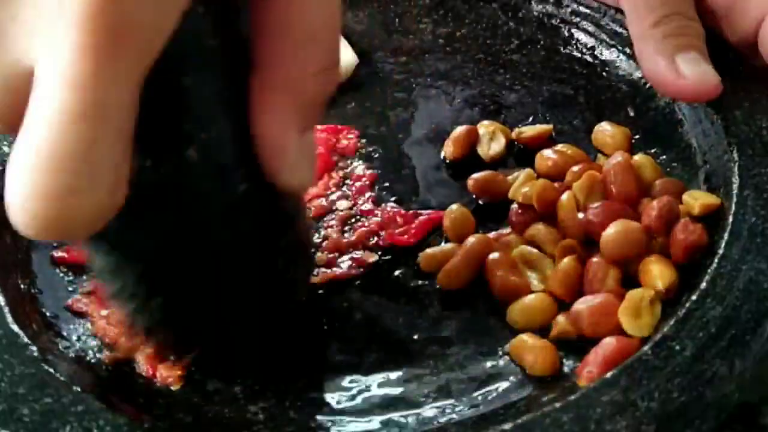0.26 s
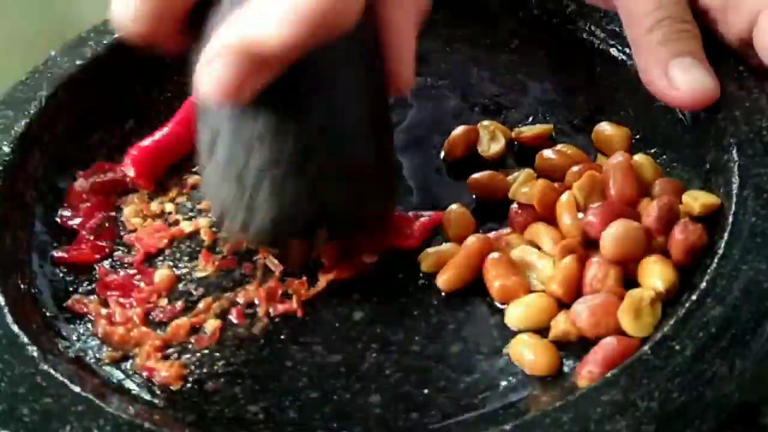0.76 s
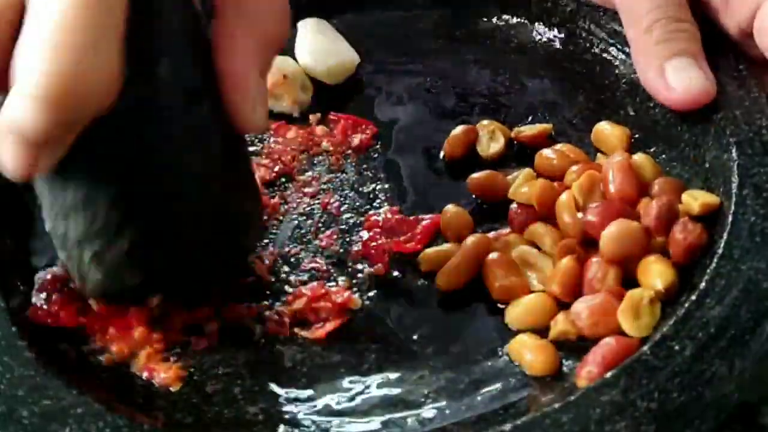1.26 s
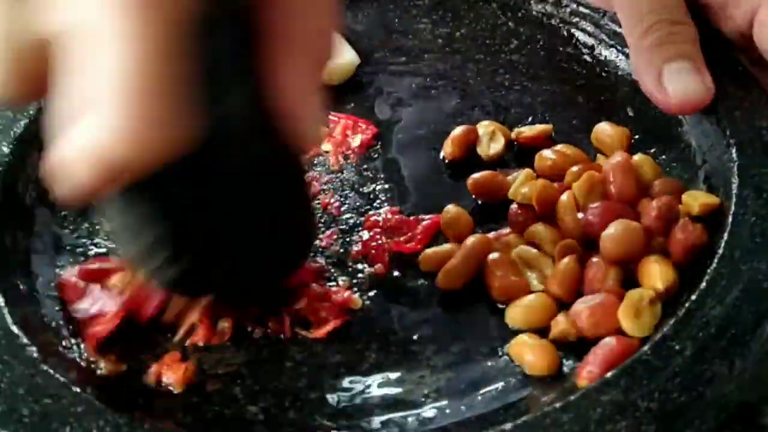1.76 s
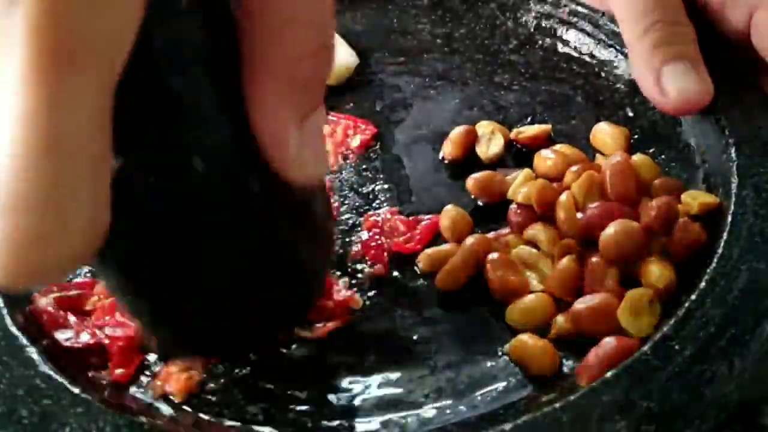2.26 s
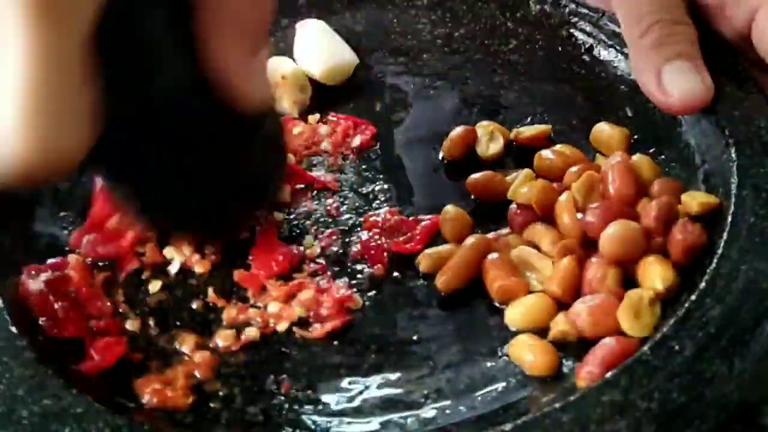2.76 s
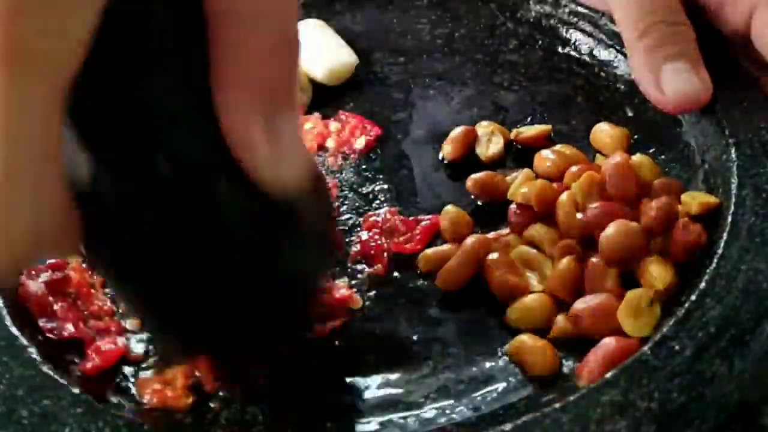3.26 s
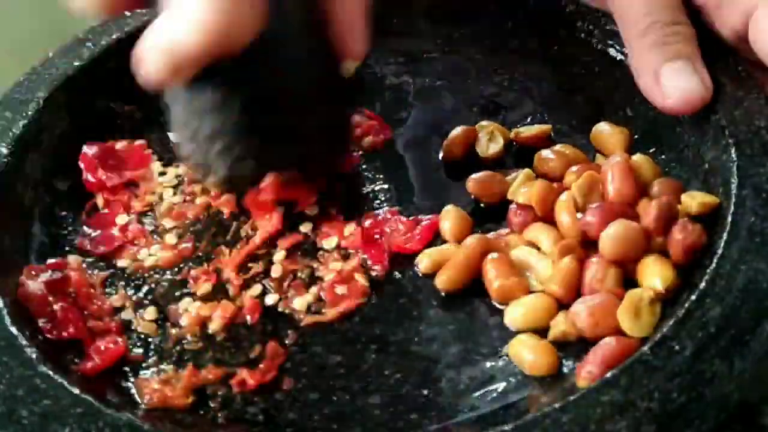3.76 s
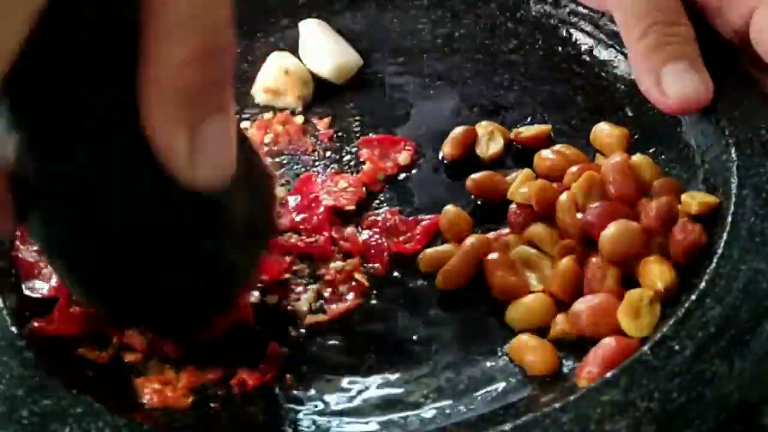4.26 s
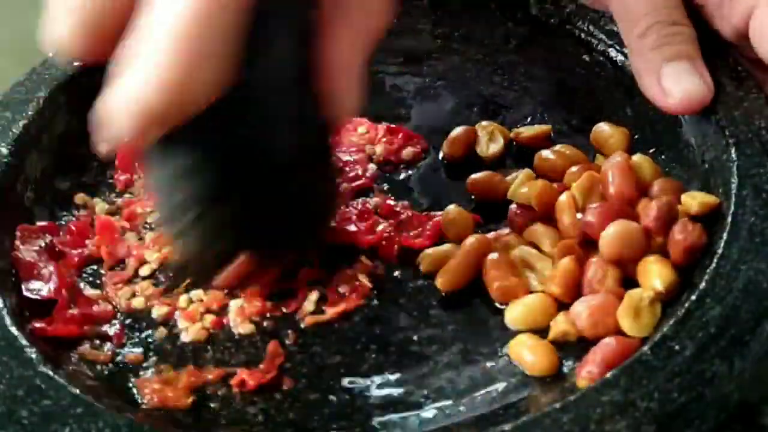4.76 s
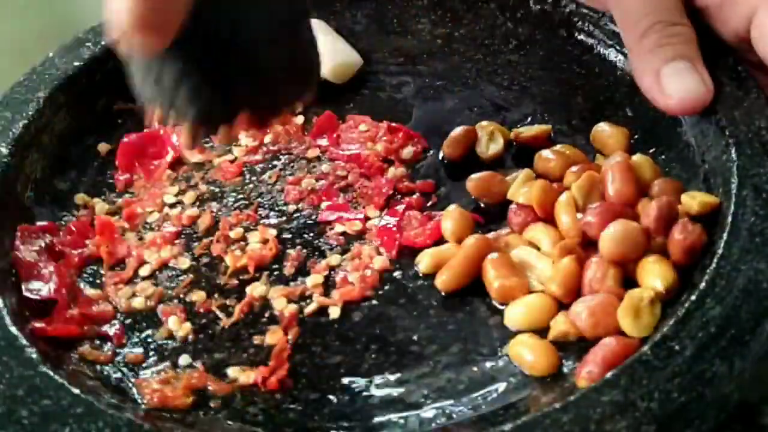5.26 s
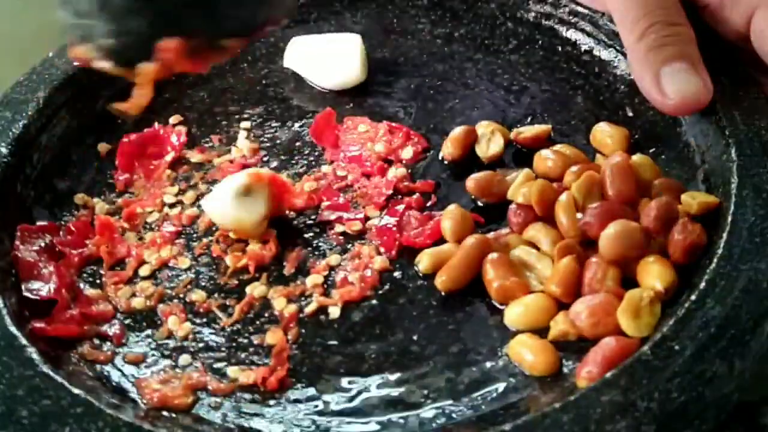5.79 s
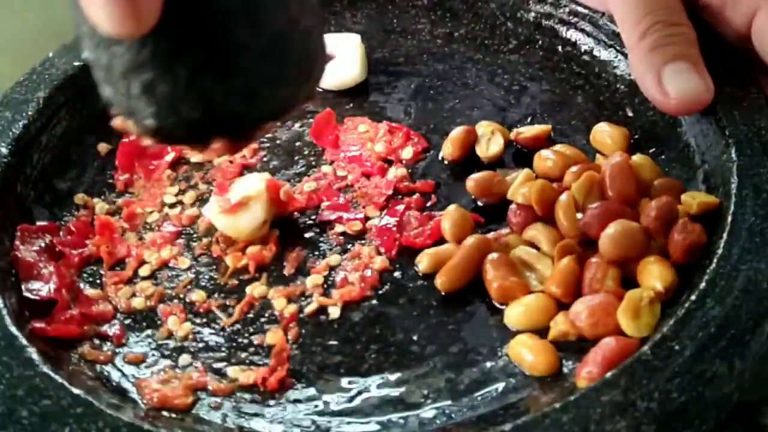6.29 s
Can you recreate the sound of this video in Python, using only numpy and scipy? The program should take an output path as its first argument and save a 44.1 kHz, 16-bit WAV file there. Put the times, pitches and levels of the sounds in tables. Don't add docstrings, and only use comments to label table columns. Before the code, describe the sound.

A stone pestle works in a stone mortar on a kitchen counter, heard very close in stereo over a quiet, low household rumble. From 0 to 0.7 s, light gritty scrapes and small ticks; at 0.73 s a duller knock with a spray of grit. Around 1.2-1.3 s dry shells split in a loud, crackling cluster, followed by coarse scraping and a knock at 1.6 s. Strokes continue, seeds snapping near 1.9 s, until the loudest, hard ringing clack at 2.41 s. Bright snaps come at 2.9 s, then uneven grinding with hollow stone rubs, especially 3.9 s, and a firm clack at 4.13 s. Softer knocks and crisp scraping run to about 5.2 s. It nearly stops, with a faint tap at 5.47 s. At 6.13 s a clove gives with a small wet crack and low thud; at 6.44 s it bursts with a louder, juicy crunch.

```python
import sys
import numpy as np
from scipy import signal
from scipy.fft import rfft, irfft, next_fast_len
from scipy.io import wavfile
from scipy.ndimage import uniform_filter1d, map_coordinates

SR = 44100
rng = np.random.default_rng(int(sys.argv[2]) if len(sys.argv) > 2 else 0)


def materialize(psi):
    bounded = np.clip(np.atleast_2d(psi).T, -1, 1)
    quanta = np.round(bounded * 32767).astype(np.int16)
    wavfile.write(sys.argv[1], SR, quanta)


def invert_db(level):
    return 10 ** (np.asarray(level, dtype=float) / 20)


N = 287973

# columns pitch_hz, density_db (dB per Hz)
GRIT_COLOUR = [(880, -47), (1500, -11), (2110, -12.5), (2660, -11), (3590, -9), (4950, -4), (6760, -5.5),
               (15100, -15), (16000, -24.5), (16500, -80)]
PORT_GAIN = np.array([[1.17], [.85]])


def unit(x):
    return x / np.sqrt(np.mean(x ** 2) + 1e-20)


def along(points, hz):
    f, v = np.transpose(points)
    return np.interp(np.log(hz + 1), np.log(f + 1), v)


def filtered(x, response):
    m = next_fast_len(x.shape[-1] + 8192)
    return irfft(rfft(x, m) * response(np.fft.rfftfreq(m, 1 / SR)), m)[..., :x.shape[-1]]


def bandpass(f, centre_hz, width_hz):
    return 1j * f * width_hz / (centre_hz ** 2 - f * f + 1j * f * width_hz)


def resonances(modes):
    return lambda f: sum((-1) ** k * invert_db(db) * bandpass(f, hz, width)
                         for k, (hz, width, db) in enumerate(modes))


def split(x, edge_hz):
    low = filtered(x, lambda f: 1 / (1 + (f / edge_hz) ** 4))
    return low, x - low


def causal(spectrum, size=1024):
    cepstrum = irfft(np.log(invert_db(along(spectrum, np.fft.rfftfreq(size, 1 / SR))) + 1e-6))
    cepstrum[1:size // 2] *= 2
    cepstrum[size // 2 + 1:] = 0
    return unit(irfft(np.exp(rfft(cepstrum)))) / np.sqrt(size)


def coloured(x, pulse):
    return signal.fftconvolve(x, pulse[None], axes=1)[:, :x.shape[1]]


def ports(pair, spectrum):
    # pitch_hz, left_right_likeness (correlation)
    likeness = [(60, 1), (180, 0.89), (550, -0.018), (1650, -0.036), (4970, 0.00027), (15000, -0.09)]
    turn = lambda hz: np.arccos(np.clip(along(likeness, hz), -1, 1)) / 2
    mid, side = filtered(pair, lambda hz: invert_db(along(spectrum, hz)) * [np.cos(turn(hz)), np.sin(turn(hz))])
    return np.array([mid + side, mid - side])


def wobble(rate):
    return map_coordinates(rng.standard_normal(int(N * rate / SR) + 4), [np.arange(N) * rate / SR])


def tail(length):
    # pitch_hz, t60_s
    kitchen_decay = [(400, 0.33), (1500, 0.16), (4000, 0.18), (12000, 0.041)]
    hz, t, z = signal.stft(rng.standard_normal((2, length)), SR, nperseg=128)
    decay = invert_db(-60 * t / along(kitchen_decay, hz)[:, None])
    h = signal.istft(z * decay, SR, nperseg=128)[1][:, :length]
    return h / np.linalg.norm(h[0])


def add(out, s, x, pan_db):
    start = round(s * SR)
    out[:, start:start + x.shape[1]] += x * invert_db(np.array([[pan_db / 2], [-pan_db / 2]]))


def shaken(push):
    # pitch_hz, width_hz, level_db
    counter_modes = [(149.2, 24, 0.5), (173, 25.7, 3), (223, 39, -6.5), (275.6, 24.7, -8)]
    board = resonances(counter_modes)
    return filtered(push, lambda f: board(f) * (1j * f / (1j * f + 110)) ** 2) * PORT_GAIN


def hum():
    # pitch_hz, density_db (dB per Hz)
    hum_colour = [(13, -56), (22, -46), (38, -15), (98, -5), (207, -11), (351, -20.5), (438, -9),
                  (517, -20.5), (578, -10.5), (660, -23), (740, -16.5), (830, -21.5), (926, -21.5),
                  (1190, -24), (2800, -33), (14800, -50), (16500, -52)]
    level_db = -47.5 + 0.6 * wobble(3.33)
    return invert_db(level_db) * unit(ports(rng.standard_normal((2, N)), hum_colour)) * PORT_GAIN


def efforts(s, hold_s, db, rise, fall):
    t = np.arange(0, N + 64, 64)[:, None] / SR
    level_db = db - rise * np.maximum(s - t, 0) - fall * np.maximum(t - s - hold_s, 0)
    return np.interp(np.arange(N) / SR, t[:, 0], (invert_db(level_db) ** 2).sum(axis=1))


def controls():
    # start_s, hold_s, grit_db, drag_db
    slide_strokes = [(0.0, 0.02, -50.5, -55.5), (0.04, .012, -55, -60), (0.155, 0.034, -50.5, -48.5),
                     (0.26, 0.02, -48, -41), (0.38, 0.02, -50, -46.5), (.415, .015, -45, -47),
                     (0.478, 0.035, -46.5, -43.5), (0.79, .03, -47, -49.5), (0.847, 0.047, -44, -46.5),
                     (1.437, 0.01, -41.5, -46), (1.465, .02, -59, -48), (1.526, 0.089, -42.5, -45.5),
                     (1.851, 0.021, -40, -50), (1.935, 0.02, -39.5, -40), (1.97, 0.0074, -39.5, -40.5),
                     (2.06, 0.054, -45, -53.5), (2.17, 0.023, -41, -44.5), (2.235, 0.02, -54, -59),
                     (2.282, 0.011, -57, -60), (2.511, 0.028, -47, -60), (2.62, 0.031, -47, -42.5),
                     (2.822, 0.03, -47, -66), (2.87, .03, -49, -60), (2.911, 0.06, -42.5, -44.5),
                     (3.073, 0.041, -46.5, -50.5), (3.175, 0.11, -51.5, -53), (3.447, 0.049, -44, -51),
                     (3.512, 0.093, -47.5, -49.5), (3.705, 0.022, -59.5, -62), (3.878, 0.045, -42.5, -42.5),
                     (4.087, 0.019, -50.5, -58), (4.56, 0.027, -45, -39.5), (4.664, 0.014, -48.5, -53),
                     (4.721, 0.011, -49.5, -45), (4.795, 0.057, -52, -47.5), (5.01, 0.048, -49, -54),
                     (5.513, 0.11, -62.5, -61), (5.92, 0.0092, -70, -59)]
    # start_s, hold_s, grit_db, drag_db
    jerk_strokes = [(.536, 0.0083, -49, -53), (0.733, 0.032, -48.5, -44), (1.14, 0.061, -56.5, -56),
                    (1.2, 0.01, -40, -52), (1.214, 0.014, -34.5, -52), (1.25, 0.073, -34, -44),
                    (1.773, 0.019, -43.5, -52), (2.414, 0.06, -45, -34.5), (2.79, 0.05, -57, -68),
                    (3.36, 0.011, -55, -56), (3.742, 0.087, -47.5, -53.5), (4.131, 0.06, -45.5, -42.5),
                    (4.225, 0.039, -46.5, -46), (4.276, 0.022, -45, -52), (4.423, 0.092, -43.5, -53.5),
                    (4.9, 0.011, -55, -65), (4.965, .02, -69, -67), (5.098, 0.019, -47.5, -50),
                    (5.19, 0.029, -68, -67), (5.468, .005, -62, -55), (6.133, 0.0031, -52.5, -46.5),
                    (6.442, 0.0067, -36, -41.5)]
    # start_s, hold_s, level_db
    hand_leans = [(0.21, 0.25, -45), (0.49, 0.027, -34.5), (0.73, 0.027, -37.5), (0.893, 0.0076, -41),
                  (1.077, 0.16, -47.5), (1.288, .01, -37.5), (1.432, 0.021, -31), (1.58, 0.039, -40),
                  (1.775, 0.1, -44.5), (1.884, 0.091, -37.5), (2.018, 0.019, -44), (2.16, 0.039, -44),
                  (2.42, 0.033, -31.5), (2.502, 0.035, -37), (2.65, 0.072, -45.5), (2.82, 0.18, -39.5),
                  (3.073, 0.047, -39.5), (3.345, 0.021, -42), (3.454, 0.016, -33), (3.555, 0.1, -48),
                  (3.742, 0.2, -44), (4.12, 0.033, -38.5), (4.263, 0.013, -38), (4.438, 0.041, -35),
                  (4.672, 0.015, -36), (4.715, .02, -33.5), (4.971, 0.069, -36.5), (5.132, 0.13, -48.5),
                  (5.483, 0.014, -41), (5.94, .005, -50), (6.433, 0.019, -34.5)]
    # start_s, dryness_db
    dry_patches = [(0, 7.5), (.6, 5), (1.1, 0), (1.7, -2.5), (2.2, 1), (2.6, 3.5), (3.1, 1), (3.6, 5.5),
                   (4.1, 0), (4.449, 6.5), (5.0, 8), (5.6, 7), (6.53, 3)]
    slide_s, slide_hold_s, *slide_levels = np.transpose(slide_strokes)
    jerk_s, jerk_hold_s, *jerk_levels = np.transpose(jerk_strokes)
    stroke_db = []
    for slide_db, jerk_db in zip(slide_levels, jerk_levels):
        power = efforts(slide_s, slide_hold_s, slide_db, rise=320, fall=267)
        power = power + efforts(jerk_s, jerk_hold_s, jerk_db, rise=2994, fall=267)
        stroke_db.append(10 * np.log10(power + 1e-12))
    grit_db, drag_db = stroke_db
    rest_db = -52
    shake_db = 10 * np.log10(efforts(*np.transpose(hand_leans), rise=396, fall=260) + invert_db(rest_db) ** 2)
    dry_db = np.interp(np.arange(N) / SR, *np.transpose(dry_patches))
    fine_db = dry_db - 9 - 0.18 * (np.maximum(grit_db, -60) + 54)
    return grit_db, fine_db, drag_db, shake_db


def gritty(per_s, spread_db, share):
    rows = rng.random((int(per_s * N / SR), 2))
    sizes = invert_db(-spread_db * np.log(rows[:, 1] + 0.0148))
    starts = np.bincount((rows[:, 0] * N).astype(int), sizes, N)
    bursts = signal.fftconvolve(starts, invert_db(-60 * np.arange(400) / SR / 0.006))[:N]
    noise = rng.standard_normal((4, N))
    return np.sqrt(1 - share) * noise[:2] + np.sqrt(share) * unit(bursts * noise[2:])


def patchy(pair, depth_db):
    z = signal.stft(pair, nperseg=256)[2]
    field = uniform_filter1d(rng.standard_normal(z.shape[1:]), size=6, axis=0)
    field = uniform_filter1d(field, size=8, axis=1)
    return signal.istft(z * invert_db(depth_db * unit(field)), nperseg=256)[1][:, :N]


def strokes():
    # pitch_hz, density_db (dB per Hz)
    drag_colour = [(210, -24), (350, -8.5), (540, -3), (606, -2), (817, -7.5), (883, -3), (2520, -15),
                   (3500, -20.5), (4550, -48), (7700, -120)]
    grit_db, fine_db, drag_db, shake_db = controls()
    catch = wobble(30)
    grains = patchy(gritty(per_s=600, spread_db=2.5, share=0.41), depth_db=1.84)
    coarse, fine = split(ports(grains, GRIT_COLOUR), 8260)
    grit = unit(coarse) + invert_db(fine_db) * unit(fine)
    grit = invert_db(grit_db + 0.6 * catch + 1.18 * wobble(70)) * grit
    scrape = patchy(gritty(per_s=120, spread_db=3.5, share=0.18), depth_db=-1.0)
    drag = invert_db(drag_db + 0.49 * catch + 1.9 * wobble(45)) * unit(ports(scrape, drag_colour))
    push = invert_db(shake_db + 25 + 2.05 * wobble(25)) * rng.standard_normal(N)
    return (grit + drag) * PORT_GAIN + shaken(push)


def snaps():
    # start_s, peak_db, pitch_hz, left_right_db
    seed_cracks = [(0.733, -28.5, 5330, 5), (0.7948, -25.5, 4760, -2), (1.1388, -33, 4350, 0),
                   (1.1974, -27, 4450, 3), (1.2505, -16, 5400, 1.5), (1.777, -35, 5500, 5),
                   (1.836, -33, 6760, 12), (1.867, -21, 5000, 5), (1.924, -26, 4860, 5),
                   (2.148, -30.5, 8200, 15), (2.4134, -19, 4370, -3), (2.601, -34, 5880, 10),
                   (2.789, -34, 5200, 1), (2.8663, -18, 6300, 5.5), (2.9058, -17, 6670, 5),
                   (2.9135, -23.5, 7400, 4), (3.1568, -28, 7600, 8), (3.162, -29.5, 5600, 5),
                   (3.357, -41.5, 6040, 13), (3.429, -33, 6700, 15), (4.1318, -31.5, 5000, 16),
                   (4.1647, -28, 7040, 13), (4.233, -29, 5300, 8), (4.2814, -21.5, 6070, 10),
                   (4.426, -23.5, 6830, 15.5), (4.545, -31, 7720, 13), (4.7214, -30, 5100, 2),
                   (0.2356, -34, 3600, 9), (1.2137, -19, 5560, 10), (1.434, -27, 6950, 8),
                    (2.0793, -28, 5460, 7.5), (3.1955, -29, 5300, 3), (3.9948, -30.5, 5460, -1),
                    (4.9506, -43, 8800, 1), (4.968, -38.5, 6720, 12), (5.047, -36, 6940, 9),
                    (5.099, -39, 7960, 7), (5.112, -30, 7900, 12), (5.918, -52, 5000, 0),
                   (0.1092, -48, 3540, 4.5), (0.5015, -32.5, 3700, 3), (0.873, -42, 4830, 4.5),
                   (1.408, -45, 6530, 2.5), (1.4227, -29, 4350, 4.5), (1.5055, -34, 5600, 2.5),
                   (1.5284, -33, 7930, 5.5), (1.6094, -26, 4300, 2.0), (1.8505, -25, 4900, 2.5),
                   (2.488, -32, 5180, 4.5), (3.0946, -35, 6580, 4.0), (3.4813, -25, 6830, 4.0),
                   (4.0721, -41, 4540, 2.5), (4.6438, -42, 6790, 6.0), (4.792, -38, 5240, 2.0),
                   (5.005, -31, 7400, 6.0), (5.029, -28, 6330, 5.1), (5.134, -31, 5000, 3.0),
                   (5.1514, -41, 7150, 2.5), (5.2174, -49, 8540, 3.0)]
    # start_s, peak_db, pitch_hz, left_right_db
    shell_cracks = [
        (1.2143, -9.5, 5800, 4),
        (1.2397, -15, 4970, 0),
        (1.2511, -6.5, 5370, 1.5),
        (1.2684, -12.5, 5600, 4),
        (1.5404, -27, 7900, 3.5),
        (3.7465, -30, 6000, 6),
    ]
    out, t = np.zeros((2, N + SR)), np.arange(SR // 11) / SR
    fizz = causal(GRIT_COLOUR)
    crush = np.minimum(t / 0.0012, 1)
    damp = [(2.5, row) for row in seed_cracks]
    dry_shells = [(16, row) for row in shell_cracks]
    for first_split, (s, db, hz, pan_db) in damp + dry_shells:
        tick = rng.standard_normal((2, len(t))) * invert_db(-60 * t / 0.026) * crush
        tick += invert_db(11.0) * tail(len(t))
        tick[:, 24] += first_split
        broad = coloured(tick, fizz)
        ping = np.sin(2 * np.pi * (hz * t + rng.random((2, 1)))) * invert_db(-60 * t / 0.025) * crush
        crack = 0.32 * broad + 0.4 * ping + filtered(tick, resonances([(hz, 1000, 8)]))
        add(out, s - 0.0006, invert_db(db - 3.0) * crack / np.abs(crack).max(), pan_db)
    return out[:, :N]


def rubs():
    # start_s, hold_s, level_db, pitch_hz
    bare_rubs = [
        (.265, 0.042, -52, 885),
        (0.831, 0.017, -45.5, 1330),
        (1.943, 0.024, -54, 1090),
        (2.614, 0.024, -47.5, 990),
        (3.523, 0.016, -53, 1410),
        (3.791, 0.024, -51, 1000),
        (3.872, 0.044, -41.5, 1340),
        (4.559, 0.031, -49, 1500),
        (4.8, 0.029, -54, 1240),
    ]
    t = np.arange(SR // 3) / SR - 0.1
    out = np.zeros((2, N + SR))
    for s, hold_s, db, hz in bare_rubs:
        noise = rng.standard_normal((3, len(t)))
        band = resonances([(hz, 0.33 * hz, 0)])
        sung = unit(filtered(noise[:2] + 0.52 * noise[2], lambda f: band(f) ** 2))
        level_db = db - 720 * np.maximum(-t, 0) - 630 * np.maximum(t - hold_s, 0)
        add(out, s - 0.1, sung * invert_db(level_db), 2.8)
    return out[:, :N]


def ringing(modes, t):
    total = np.zeros((2, len(t)))
    for (hz, db, t60), swing in zip(modes, rng.random((len(modes), 2, 2))):
        level_db = db + 4.5 + 6.0 * swing[0, :, None] - 80 * t / t60
        pitch_hz = hz * (0.995 + 0.0094 * swing[1, 0])
        total += invert_db(level_db) * np.sin(2 * np.pi * (pitch_hz * t + swing[1, :, None]))
    return total * np.minimum(t / 0.0044, 1)


def blows():
    # start_s, peak_db, splash_db, hardness_db, left_right_db
    pestle_blows = [(0.325, -30, -32, -17, 1), (0.505, -31.5, -23, -25, -5), (0.734, -17, -5, -26, 3.5),
                    (1.361, -33, -24, -14, 3), (1.437, -31.5, -20, -31, 4), (1.443, -33, -30, -25.5, 3),
                    (1.4485, -22.5, -15, -19.5, 3), (1.624, -16, -53, -13.5, 2), (2.4107, -1, -23, -8, 0.5),
                    (2.445, -18.5, -24, -10, 12), (2.681, -27.5, -30, -18.5, 4), (2.966, -35, -14, -14, 6),
                    (3.024, -23, -34, -15, 3), (3.229, -37.5, -24, -21, 3), (4.132, -13, -28, -10, 3.5),
                    (4.278, -43.5, 6.5, -7.5, 11), (4.629, -23, -38, -15, 5.5), (5.466, -46, -30, -7, 10),
                    (6.13, -32, -7, 3, 4), (6.437, -19.5, -20, -4, 2), (2.479, -24, -25, -10, 2),
                    (3.9, -31.5, -30, -26, 1)]
    # pitch_hz, level_db, t60_s
    ring_modes = [(422, -4, .3), (600, -7, .3), (759, -12, .4), (886, -4, .2), (945, -18, .45),
                  (1010, -12, .36), (1120, -13, .4), (1390, -14, .38), (1450, -13, .2), (1600, -9, .22),
                  (1750, -11, .22), (1970, -16, .23), (2305, -25, .28), (2455, -28, .55)]
    # pitch_hz, density_db (dB per Hz)
    clack_colour = [(180, -50.5), (300, -24), (495, -14), (583, 1), (694, -16), (771, 0), (991, -0.5),
                    (1250, -6), (1590, 0.5), (2160, -12.5), (2700, -22.5), (3000, -30.5), (3900, -48.5),
                    (6600, -120)]
    out, t, pushes = np.zeros((2, N + SR)), np.arange(SR // 3) / SR, np.zeros(N + SR)
    clack, fizz = causal(clack_colour), causal(GRIT_COLOUR)
    lead_s = 0.00585
    for s, db, splash_db, hard_db, pan_db in pestle_blows:
        burst = rng.standard_normal((4, len(t))) * np.minimum(t / 0.0011, 1)
        body = 0.53 * burst[:2] * invert_db(-60 * t / 0.071) + invert_db(13.5) * tail(len(t))
        body[:, 30] += 9
        body = coloured(body, clack)
        body += invert_db(-18 + 0.6 * db) * ringing(ring_modes, t)
        low, high = split(body, 700)
        body = low + invert_db(1.9 * hard_db + 16) * high
        body /= np.abs(body).max()
        spray = coloured(split(burst[2:] * invert_db(-60 * t / 0.013), 2300)[1], fizz)
        add(out, s + 0.00022, invert_db(db + 3.5) * body + invert_db(db + splash_db) * spray, pan_db)
        early = np.sin(2 * np.pi * 560 * t) * (t / 0.0011) * np.exp(1 - t / 0.0013)
        add(out, s - lead_s, invert_db(db - 12) * -early[None], 2.5)
        pushes[round(s * SR) - 60:][:120] += invert_db(-5.5 + 0.7 * db) * np.hanning(120)
    return out[:, :N] + shaken(pushes[:N])


def notes():
    # start_s, peak_db, pitch_hz, t60_s
    struck_notes = [(0.7325, -29, 267, 0.23), (.736, -24, 887, 0.067), (.736, -24, 1870, 0.027),
                    (1.449, -28, 427, 0.14), (1.625, -22, 810, 0.049), (2.41, -37.5, 1647, 0.78),
                    (2.412, -44, 2455, 0.69), (2.416, -30, 4320, .07), (2.42, -37, 5220, 0.33),
                    (2.413, -37, 3880, .1), (2.413, -35, 3100, .06), (0.732, -23.5, 165, 0.21),
                    (.736, -24, 1094, 0.031), (2.41, -23, 180, 0.2), (2.412, -29, 422, 0.099),
                    (2.411, -5, 1692, 0.037), (4.63, -37, 1480, 0.048), (4.63, -37, 2080, 0.025),
                    (3.895, -46, 540, 0.11), (4.134, -21, 1360, 0.042), (4.133, -22.5, 880, 0.057),
                    (4.133, -19, 1830, 0.037), (5.4675, -36.5, 3710, 0.03), (5.467, -41, 2500, 0.016)]
    out, t = np.zeros((2, N + SR)), np.arange(SR // 2) / SR
    for s, db, hz, t60 in struck_notes:
        turns = rng.random() + np.minimum(hz / 2500, 0.5) * rng.random((2, 1))
        swell = np.interp(t, np.arange(40) / 70, rng.standard_normal(40))
        beat = 1 + 0.4 * np.minimum(t / 0.04, 1) * swell
        detune = np.interp(t, np.arange(80) / 150, rng.standard_normal(80))
        turns = turns + 0.17 * np.cumsum(detune) * 150 / SR
        onset = np.minimum(t / max(0.0015, 1.3 / hz), 1)
        tone = np.sin(2 * np.pi * (hz * t + turns))
        add(out, s, invert_db(db - 60 * t / t60) * beat * onset * tone, 2.8)
    return out[:, :N]


def thuds():
    # start_s, peak_db, pitch_hz
    base_rocks = [
        (4.12, -44, 55.4),
        (6.127, -35, 67),
    ]
    out, t = np.zeros((2, N + SR)), np.arange(SR // 5) / SR
    for s, db, hz in base_rocks:
        swing = np.sin(2 * np.pi * hz * t)[None] * (t / 0.016) * np.exp(1 - t / 0.013)
        add(out, s, invert_db(db) * swing, 2.6)
    return out[:, :N]


def splats():
    # start_s, level_db, t60_s, left_right_db
    clove_bursts = [
        (6.1299, -32.5, 0.028, 4.5),
        (6.437, -17.5, 0.039, 8.5),
    ]
    # pitch_hz, density_db (dB per Hz)
    wet_colour = [(700, -31), (1200, -5), (2500, -7), (4400, -3.5), (6100, -2), (7700, -10.5), (15000, -11),
                  (16500, -64)]
    out, t, wet = np.zeros((2, N + SR)), np.arange(SR // 6) / SR, causal(wet_colour)
    for s, db, t60, pan_db in clove_bursts:
        decay = invert_db(-60 * t / t60) + invert_db(-13.5 - 60 * t / 0.15)
        burst = rng.standard_normal((2, len(t))) * np.minimum(t / 0.002, 1) ** 2 * decay
        add(out, s, invert_db(db) * coloured(burst, wet), pan_db)
    return out[:, :N]


def scene():
    # pitch_hz, width_hz, depth (0-1)
    room_nulls = [(369, 126, 0.92), (532.5, 107, 1)]
    nulls = lambda f: np.prod([1 - depth * bandpass(f, hz, width) for hz, width, depth in room_nulls], axis=0)
    mix = hum() + strokes() + snaps() + rubs() + blows() + notes() + thuds() + splats()
    return filtered(mix, nulls)


def thinned(x):
    # pitch_hz, margin_db
    masking = [(2000, -30), (2500, -2.2), (4500, -2.2), (5500, -3), (8000, -2.8), (11000, -1.4),
               (14900, -.5), (15300, 1.5)]
    hz, _, z = signal.stft(x, SR, nperseg=1024)
    power = uniform_filter1d(np.abs(z.sum(axis=0)) ** 2, size=3, axis=1)
    power = uniform_filter1d(power, size=6, axis=0)
    wide = np.where(hz < 8200, 4, 12)
    band = np.arange(len(hz)) // wide * wide + wide // 3
    moment = np.arange(z.shape[2]) // 3 * 3
    band_db = 10 * np.log10(np.abs(power[band][:, moment]) + 1e-14)
    around_db = uniform_filter1d(band_db, size=42, axis=0)
    rise = np.gradient(np.log10(np.abs(power[60:]) + 1e-14).mean(axis=0))
    attack = uniform_filter1d(1. * (rise > 0.31), size=3) > 0.1
    keep = (band_db > around_db + along(masking, hz)[:, None]) | attack
    below_top = hz[:, None] < np.where(attack, 16300, 15580)
    return signal.istft(z * keep * below_top, SR, nperseg=1024)[1][:, :N]


def roll_off(x):
    return signal.sosfilt(signal.butter(12, 16100, fs=SR, output="sos"), x)


def record(dry):
    clipped = dry / (1 + np.abs(dry / 1.6) ** 8) ** (1 / 8)
    return roll_off(thinned(clipped))


dry = scene()
out = record(dry)
materialize(out)
```